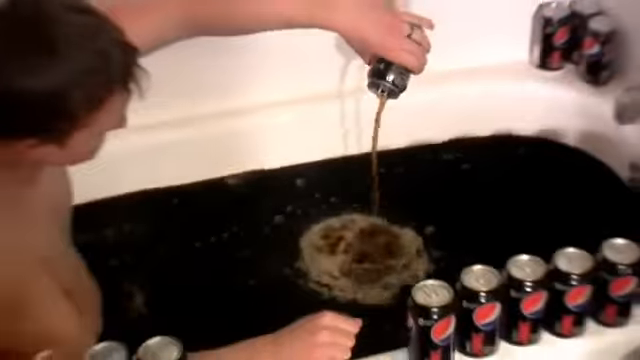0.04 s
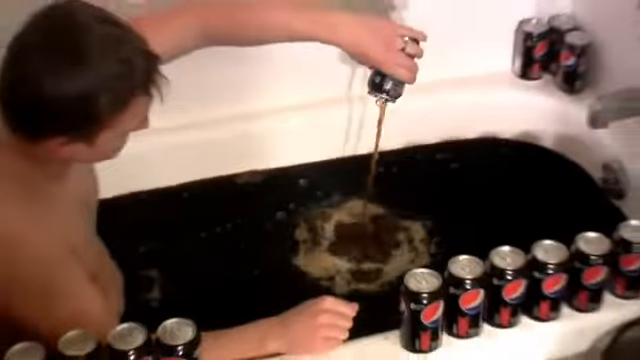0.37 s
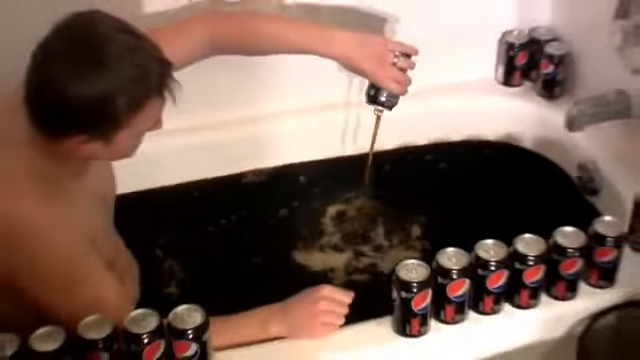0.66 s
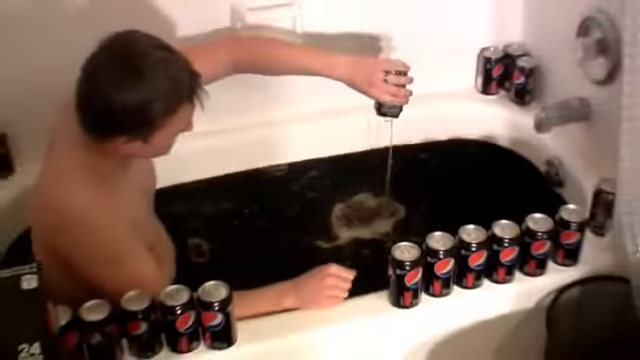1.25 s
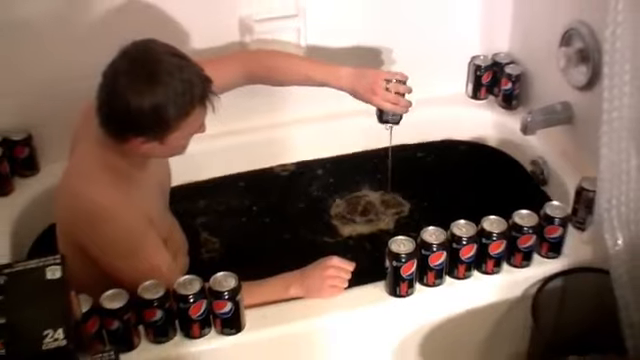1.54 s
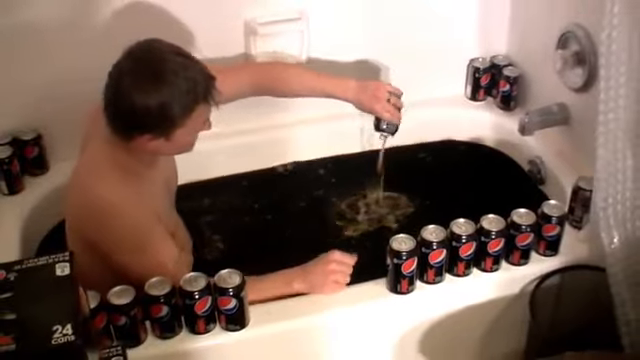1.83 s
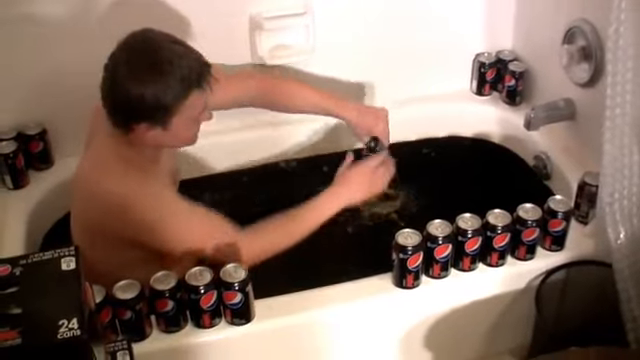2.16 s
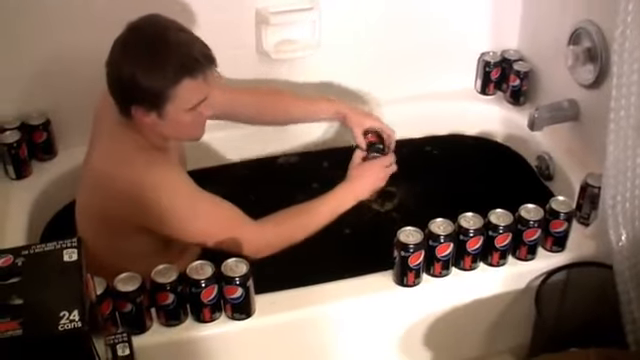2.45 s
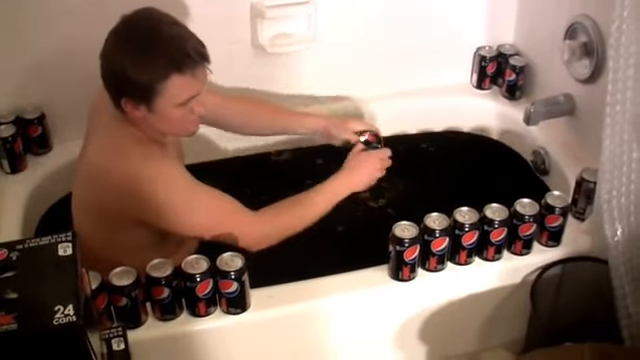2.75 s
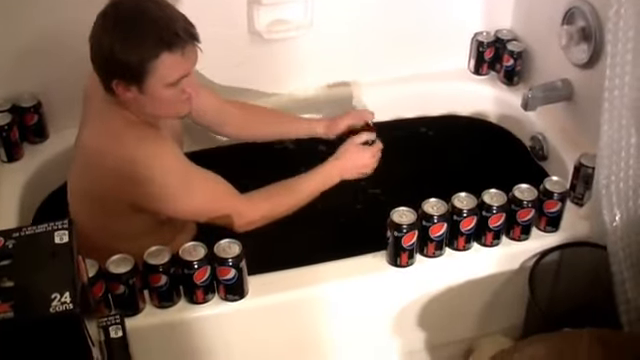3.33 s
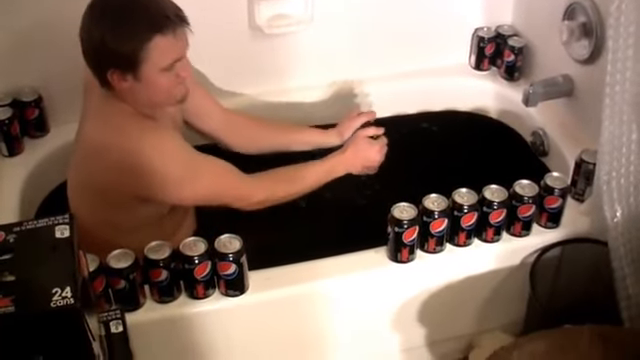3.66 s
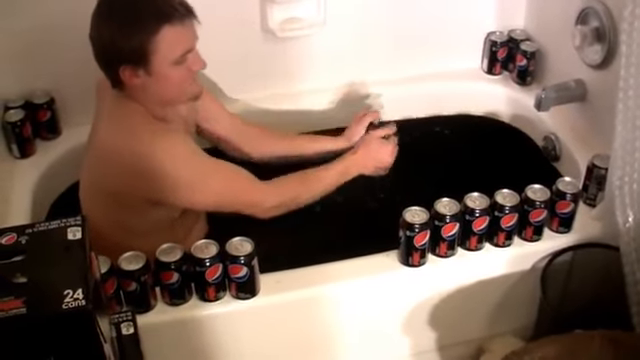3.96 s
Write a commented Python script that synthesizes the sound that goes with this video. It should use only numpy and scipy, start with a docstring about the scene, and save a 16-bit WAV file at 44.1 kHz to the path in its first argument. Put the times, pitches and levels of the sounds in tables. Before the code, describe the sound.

Soda pours from a can into a filled bathtub, pattering, gurgling and fizzing. Then hands crush the empty can with sharp snaps and soft dents that ring in a small bathroom, the loudest overloading the microphone.

```python
"""Soda pours from a can into a bathtub full of it: the stream patters and gurgles, and the foam fizzes.
A small hard bathroom rings after the sounds, over a low rumble. By 1.7 seconds only faint bubbling and
fizz are left. From 1.9 seconds two hands crush the empty can, whose wall gives way in sharp snaps and
soft dents; the loudest snaps overload the microphone. Soon the bath stirs softly, and at 2.9 seconds
the can caves in with a thump. More snaps follow while the bubbling and the fizz fade."""
import sys
import numpy as np
from scipy import signal
from scipy.fft import rfft, irfft, next_fast_len
from scipy.io import wavfile
from scipy.ndimage import uniform_filter1d

SR = 44100
rng = np.random.default_rng(int(sys.argv[2]) if len(sys.argv) > 2 else 0)


def to_wav(s):
    """Save 16-bit WAV."""
    ch = np.atleast_2d(s).T  # columns
    pcm = np.round(np.clip(ch, -1, 1) * 32767)  # PCM
    wavfile.write(sys.argv[1], SR, pcm.astype(np.int16))


N = 176400

# The pour and the bubbling after it. Each row: time in seconds, then patter, bubbles and gurgle in dB.
POUR_LEVELS = [(0, -35.5, -40.5, -47), (.28, -29, -36.5, -49), (.5, -34, -42, -46),
               (.62, -35, -41.5, -36.5), (.87, -35, -48, -42), (.98, -39, -43.5, -41.5),
               (1.35, -33.5, -42, -52.5), (1.68, -42.5, -49, -63)]
BUBBLING_FADE_S, FADE_DB_PER_S = 3.36, 19  # the faint bubbling left in the bath starts to die away
# The foam. Each row: time in seconds, level in dB.
FOAM_LEVELS = [(0, -32), (.72, -30), (1.2, -33), (2.4, -37), (4, -42.5)]
# The tone of the fizz. Each row: frequency in Hz, level in dB.
FIZZ_TONE = [(300, -31), (1000, -19), (2500, -0.5), (5500, 1.5), (11000, -4.5), (14000, -11.5)]
# The tone of the rumble. Each row: frequency in Hz, level in dB.
RUMBLE_TONE = [(20, -25), (80, 0), (350, -5), (3000, -27)]
# Clusters of bubbles. Each row: start in seconds, level in dB, pitch in Hz.
GLUG_EVENTS = [(0.019, -29, 2600), (.065, -29, 2170), (0.151, -32, 430), (.265, -35, 457),
               (.359, -25.5, 2090), (1.275, -31.5, 440), (1.335, -31.5, 528), (1.733, -32.5, 667),
               (1.803, -29.5, 824)]
# Slaps on the surface. Each row: start in seconds, level in dB, pitch in Hz, fade time in seconds.
SPLASH_EVENTS = [(.372, -24, 2070, 0.01), (0.465, -21, 2220, 0.022), (0.659, -26, 1490, 0.012),
                 (0.677, -27.5, 4260, 0.019), (0.758, -25.5, 2070, 0.089), (0.777, -28.5, 11600, 0.0089),
                 (1.205, -28.5, 10800, 0.0058)]
# Snaps of the can wall. Each row: start in seconds, ring level in dB, panel pitch in Hz,
# crack level in dB, fade time in seconds.
SNAP_EVENTS = [(1.889, -27.5, 1550, -15, 0.0064), (1.922, -19, 1660, -12.5, 0.0071),
               (1.948, -24, 1300, -17.5, 0.0098), (2.039, -40, 2080, -25, 0.0078),
               (2.101, -6, 1500, -11.5, 0.0038), (2.285, -17, 2060, -18.5, 0.015),
               (2.928, -11, 2080, -9.5, 0.006), (2.957, -17, 2080, -18.5, 0.0056),
               (3.042, -17, 2170, -12, 0.0048), (3.174, -12, 1690, -14, 0.005),
               (3.286, -14, 1370, -25, 0.0094), (3.366, -12, 1940, -17.5, 0.013),
               (3.669, -23, 1620, -48, 0.006), (3.688, -13, 2040, -15.5, 0.0044),
               (3.744, -20.5, 1730, -28, 0.059), (3.82, -23, 2060, -34, 0.015)]
# How one panel of the wall rings. Each row: multiple of its pitch, width as a share of that, level in dB.
PANEL_RINGS = [(1, 0.2, 1.5), (1.5, 0.26, -5)]
# How the whole can rings. Each row: pitch in Hz, width as a share of the pitch, level in dB.
SHELL_RINGS = [(1046, 0.098, -10), (1260, 0.17, -8.5), (2180, 0.12, -10), (3000, 0.039, -11)]
SHELL_SHIFT, SHELL_LOWEST_HZ = 0.042, 846  # each fold shifts these pitches by about 4 percent
# The tone of a crack. Each row: frequency in Hz, level in dB.
CRACK_TONE = [(300, -25), (1200, 1), (3500, -1.5), (6200, -1), (9000, -5.5), (14000, -12.5)]
BRIGHT_PANEL_HZ, DULLING = 1820, 0.58  # larger, lower panels crack more dully
CRINKLE_DB, CRINKLE_S = -8, 0.024  # tiny creases after each crack
# Soft dents. Each row: start in seconds, air pitch in Hz, air level in dB, wall pitch in Hz,
# wall level in dB, fade time in seconds.
DENT_EVENTS = [(1.973, 245, -28.5, 1100, -34, 0.087), (2.017, 237, -27.5, 1130, -19.5, 0.0063),
               (2.48, 275, -32.5, 1190, -34.5, 0.02), (2.683, 262, -20.5, 1062, -16.5, 0.011),
               (2.752, 376, -28, 885, -26.5, 0.076), (2.921, 593, -21, 1100, -16.5, 0.0024),
               (3.04, 290, -28.5, 1120, -25, 0.0088), (3.559, 560, -23.5, 1530, -19.5, 0.017)]
# The bathroom's echo. Each row: frequency in Hz, seconds it takes to fade by 60 dB.
ECHO_TIMES = [(100, 0.06), (250, 0.606), (12000, 0.3141)]
DIRECT_DB, EARLY_DB, EARLY_S = -7, 3, 0.012
# Standing waves between the walls. Each row: frequency in Hz, level of the added ring in dB.
WALL_WAVES = [(253, 4), (346, -1.5), (425, -1.5), (549, -6), (744, 0.5)]
# Stereo width. Each row: frequency in Hz, gain in dB of the difference between left and right.
STEREO_WIDTH = [(60, 3), (130, -10), (1200, -15), (4000, -9), (13000, -1)]
LIMIT_DB, LIMIT_ATTACK_S, RECOVER_DB_PER_S = -10.5, 0.0053, 22
CLIP_LEVEL, LOPSIDED, TOP_HZ = 1.02, 0.12, 14100


def amp(db):
    """Turn decibels into a number to multiply by."""
    return 10 ** (np.asarray(db) / 20)


def unit(x):
    """Scale a signal to an average power of 1."""
    return x / np.sqrt(np.mean(x ** 2) + 1e-20)


def along(points, hz):
    """Read between rows of frequency and value, with octaves evenly spaced."""
    freqs, values = np.transpose(points)
    return np.interp(np.log(hz + 1), np.log(freqs + 1), values)


def curves(rows):
    """Give one value per sample for each column after the time."""
    times, *columns = np.transpose(rows)
    return [np.interp(np.arange(N) / SR, times, column) for column in columns]


def filtered(x, response):
    """Multiply each frequency in x by the gain that response gives for it."""
    n = x.shape[-1]
    padded = next_fast_len(n + SR // 8)
    return irfft(rfft(x, padded) * response(np.fft.rfftfreq(padded, 1 / SR)), padded)[..., :n]


def coloured(x, tone):
    """Shape x with a tone table."""
    return filtered(x, lambda f: amp(along(tone, f)))


def resonate(x, rings):
    """Make x ring. Each row: pitch in Hz, width as a share of the pitch, level in dB."""
    def band(f, hz, width):
        damping = 2j * f * hz * width
        return (damping / (hz * hz - f * f + damping)) ** 2
    return filtered(x, lambda f: sum(amp(db) * band(f, hz, width) for hz, width, db in rings))


def add(out, start, x):
    """Mix x into out at a start time in seconds."""
    i = max(round(start * SR), 0)
    out[:, i:i + x.shape[1]] += x[:, :max(N - i, 0)]


def crackle(fade_s, spiky):
    """A dying burst of tiny uneven clicks."""
    t = np.arange(SR // 4) / SR
    return rng.standard_normal(len(t)) * np.exp(spiky * rng.standard_normal(len(t)) - t / fade_s)


def all_around(pair, tone):
    """Blend two unrelated noises into a sound that comes from all sides."""
    mid, side = unit(coloured(pair, tone))
    return np.array([mid + side, mid - side])


def bathroom(x):
    """The sound arrives directly, then as dense echoes from the tub, then as a fading tail."""
    hz, t, noise = signal.stft(rng.standard_normal((2, SR // 2)), SR, nperseg=256)
    tail = noise * amp(-60 * t / along(ECHO_TIMES, hz)[:, None])
    early_boost = 1 + amp(EARLY_DB) * np.exp(-t / EARLY_S)
    mid, side = signal.istft(tail * early_boost, SR, nperseg=256)[1]
    mid[0] += amp(DIRECT_DB) * np.linalg.norm(mid)
    return signal.fftconvolve(x[None], np.array([mid + side, mid - side]), axes=1)


def burst(x, db):
    """A short sound in the room, with the energy of 30 milliseconds at the given level."""
    echoing = bathroom(x)
    return amp(db) * echoing / np.sqrt(np.sum(echoing.mean(0) ** 2) / (.03 * SR))


def flowing(x, level_db):
    """A lasting sound in the room; its echoes change as the liquid moves."""
    out, hop = np.zeros((2, N)), SR // 12
    for i in range(0, N, hop):
        add(out, i / SR, bathroom(x[i:i + hop]))
    return out / out.mean(0).std() * amp(level_db)


def bubbles(per_s, hz, spread, cycles, size_db, rise):
    """Bubbles form at random times; each rings with a fading tone that rises in pitch."""
    when, radius, angle, rank = rng.random((int(per_s * N / SR), 4)).T[:, :, None]
    bell_curve = np.sqrt(-2 * np.log(1 - radius)) * np.cos(2 * np.pi * angle)
    pitch = np.clip(hz * np.exp(spread * bell_curve), 100, TOP_HZ)
    samples = np.arange(min(int(2 * cycles / hz * SR), SR // 10))
    age = pitch * samples / SR / cycles
    size = amp(-size_db * np.log(1 - .98 * rank))  # many quiet bubbles, a few loud ones
    fade = np.exp(-np.pi * age) - np.exp(-2 * cycles * age)
    tone = np.sin(2 * np.pi * cycles * age * (1 + rise * np.minimum(age, 1) / 2))
    positions = (when * N).astype(int) + samples
    return np.bincount(positions.ravel(), (size * fade * tone).ravel(), N)[:N]


def stream():
    """Falling soda patters, traps bubbles and gurgles; faint bubbling lingers, then dies away."""
    fade_db = FADE_DB_PER_S * np.maximum(np.arange(N) / SR - BUBBLING_FADE_S, 0)
    patter_db, bubble_db, gurgle_db = curves(POUR_LEVELS)
    small = bubbles(per_s=900, hz=1900, spread=0.44, cycles=6.4, size_db=5.5, rise=0.26)
    patter = flowing(small, patter_db - fade_db)
    large = bubbles(per_s=600, hz=645, spread=0.418, cycles=9.3, size_db=2.5, rise=0.13)
    trapped = flowing(large, bubble_db - fade_db)
    gurgle = resonate(rng.standard_normal(N), [(231.8, 0.056, 3), (363, 0.18, -11.5)])
    return patter + trapped + flowing(gurgle, gurgle_db)


def foam():
    """Thousands of tiny bubbles burst on the surface, in small uneven flurries."""
    fizz_db, = curves(FOAM_LEVELS)
    pops = rng.standard_normal((2, N)) * np.exp(0.4 * rng.standard_normal(N))
    flurry_db = 1.4 * unit(uniform_filter1d(rng.standard_normal(N), size=1500))
    return all_around(pops, FIZZ_TONE) * amp(fizz_db + flurry_db)


def rumble(db=-50):
    """A faint, steady low noise fills the room."""
    return amp(db) * all_around(rng.standard_normal((2, N)), RUMBLE_TONE)


def splashes(slap_width=0.49, glug_width=0.11, glug_cycles=23):
    """Lumps in the stream slap the surface and push bubbles under; bigger, lower ones ring longer."""
    out = np.zeros((2, N))
    for start, db, hz, fade_s in SPLASH_EVENTS:
        slap = resonate(crackle(fade_s, spiky=1.05), [(hz, slap_width, 0)])
        add(out, start, burst(slap, db))
    for start, db, hz in GLUG_EVENTS:
        glug = resonate(crackle(glug_cycles / hz, spiky=0.56), [(hz, glug_width, 0)])
        add(out, start, burst(glug, db))
    return out


def snaps(hollow_hz=377, hollow_width=0.56, hollow_db=-20.5):
    """A panel flips with a crack and crinkles on; it rings and shakes the can and the air inside."""
    out = np.zeros((2, N))
    cut_lows = signal.butter(6, SHELL_LOWEST_HZ, 'high', fs=SR, output='sos')
    for start, ring_db, hz, crack_db, fade_s in SNAP_EVENTS:
        flip = crackle(fade_s, spiky=0.62)
        panel = [(hz * multiple, width, db) for multiple, width, db in PANEL_RINGS]
        shell = [(pitch * np.exp(SHELL_SHIFT * rng.standard_normal()), width, db)
                 for pitch, width, db in SHELL_RINGS]
        ring = signal.sosfilt(cut_lows, resonate(flip, panel + shell))
        add(out, start, burst(ring, ring_db))
        clicks = unit(crackle(fade_s, spiky=0.5))
        crinkle = amp(CRINKLE_DB) * unit(crackle(CRINKLE_S, spiky=1.5))
        tilt = DULLING * np.log2(hz / BRIGHT_PANEL_HZ)
        crack = filtered(coloured(clicks + crinkle, CRACK_TONE), lambda f: (1 + f / hz) ** tilt)
        add(out, start, burst(crack, crack_db))
        hollow = resonate(flip, [(hollow_hz, hollow_width, 0)])
        add(out, start, burst(hollow, crack_db + hollow_db))
    return out


def dents(width=0.29):
    """The wall folds slowly under the fingers: a dull pop of air and a short ring."""
    out = np.zeros((2, N))
    for start, air_hz, air_db, wall_hz, wall_db, fade_s in DENT_EVENTS:
        push = crackle(fade_s, spiky=0.87)
        pop = resonate(push, [(air_hz, width, 0)])
        ring = resonate(push, [(wall_hz, width, 0), (wall_hz * 2.01, .2, -9)])
        add(out, start, burst(pop, air_db) + burst(ring, wall_db))
    return out


def slosh(start_s=2.38, hz=282, db=-44):
    """The bath stirs softly as the arms work."""
    stirring = resonate(rng.standard_normal(N), [(hz, 0.39, 0)])
    return (np.arange(N) / SR > start_s) * flowing(stirring, db)


def collapse(start_s=2.92, hz=345, db=-9.5, rise_s=0.0011):
    """The middle of the can caves in at once: one short push of air, a thump with no echo."""
    out, t = np.zeros((2, N)), np.arange(SR // 8) / SR
    push = t / rise_s * np.exp(1 - t / rise_s) * np.sin(2 * np.pi * hz * t)
    add(out, start_s, amp(db) * push[None])
    return out


def standing_waves(f):
    """Waves between the walls boost a few low pitches and cancel one between the first two."""
    def peak(hz, width_hz):
        return 1j * f * width_hz / (hz * hz - f * f + 1j * f * width_hz)
    boost = 1 + sum(amp(db) * peak(hz, width_hz=13.9) for hz, db in WALL_WAVES)
    return boost * (1 - peak(hz=307.6, width_hz=24))


def scene():
    """Mix it all; two microphones close together hear the low and middle pitches almost alike."""
    mix = rumble() + stream() + splashes() + foam() + slosh() + snaps() + dents() + collapse()
    left, right = filtered(mix, standing_waves)
    mid = (left + right) / 2
    side = coloured((left - right) / 2, STEREO_WIDTH)
    return np.array([mid + side, mid - side])


def record(dry):
    """A slow limiter turns loud snaps down too late, so their first peaks are flattened unevenly."""
    def lag(x):
        step = 1 / (LIMIT_ATTACK_S * SR)
        return signal.lfilter([step], [1, step - 1], x)
    level_db = 10 * np.log10(lag(dry.mean(0) ** 2) + 1e-12)
    over_db = np.maximum(level_db - LIMIT_DB, 0)
    recovery_db = RECOVER_DB_PER_S * np.arange(N) / SR
    cut_db = lag(np.maximum.accumulate(over_db + recovery_db) - recovery_db)
    held = dry * amp(-cut_db)
    clipped = held / (1 + np.abs(held / CLIP_LEVEL) ** 8) ** (1 / 8)
    uneven = clipped + LOPSIDED * clipped ** 8
    # Drop the highest treble and soften the bass below 30 Hz.
    return filtered(uneven, lambda hz: (hz < TOP_HZ) * hz / np.hypot(hz, 30))


dry = scene()
out = record(dry)
to_wav(out)
```